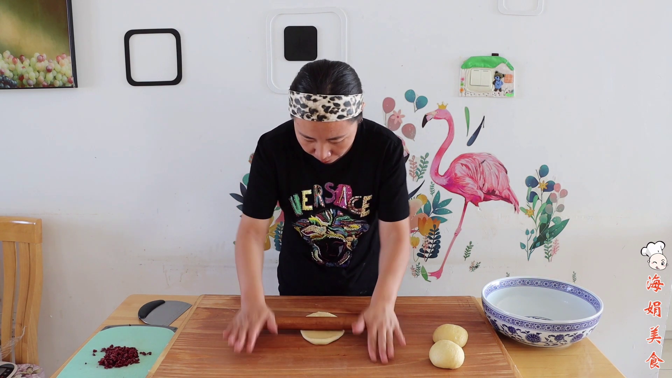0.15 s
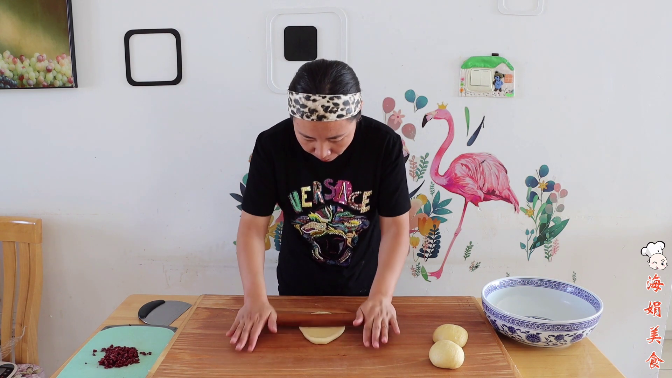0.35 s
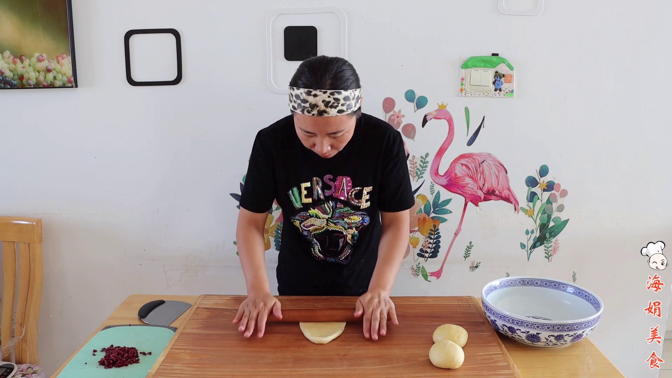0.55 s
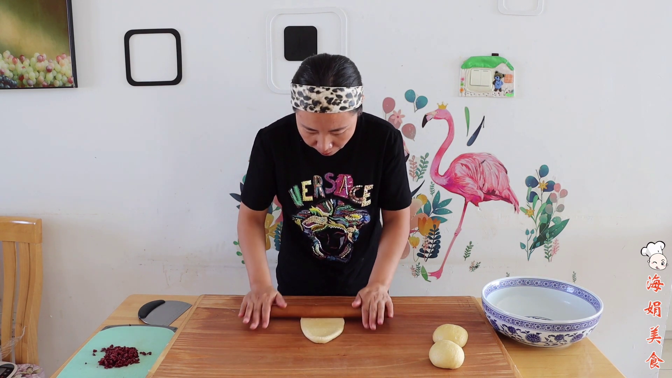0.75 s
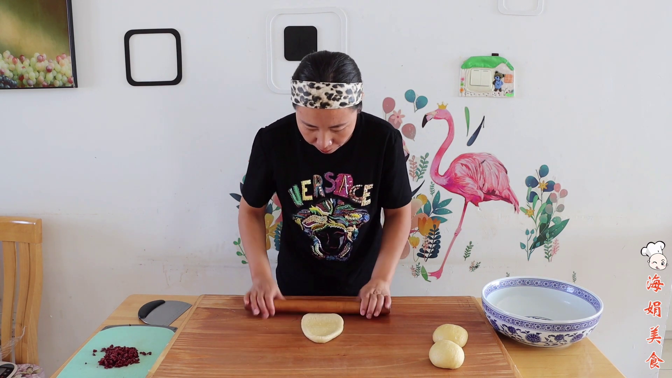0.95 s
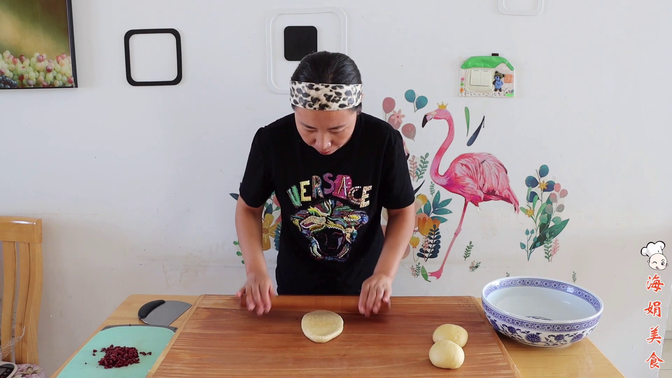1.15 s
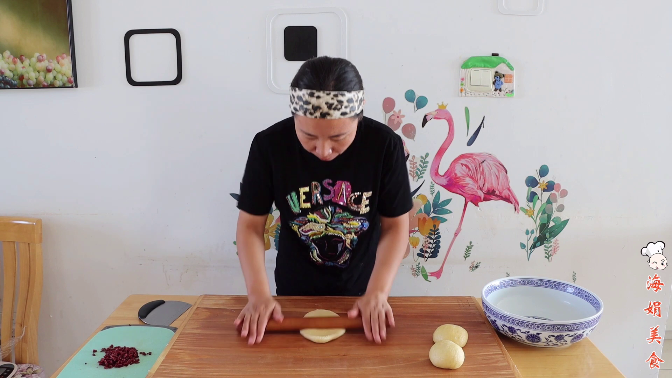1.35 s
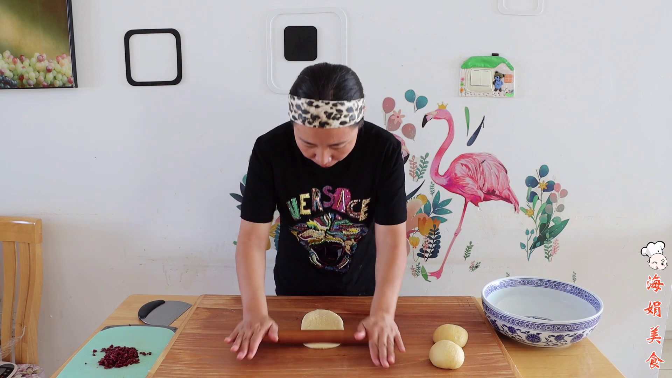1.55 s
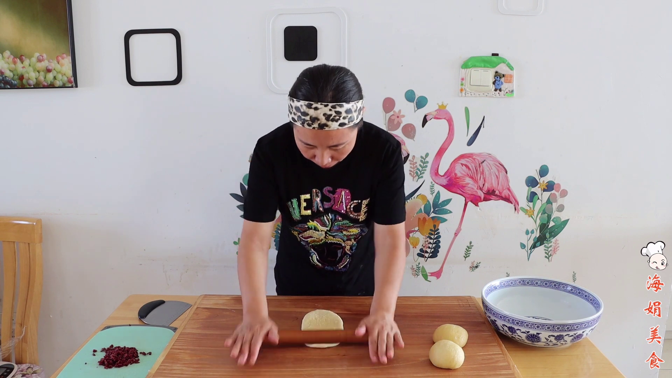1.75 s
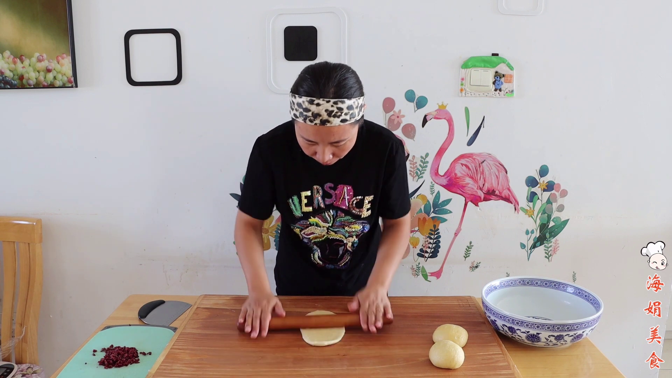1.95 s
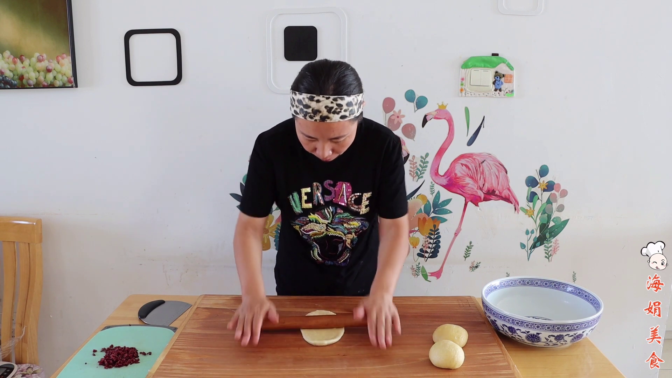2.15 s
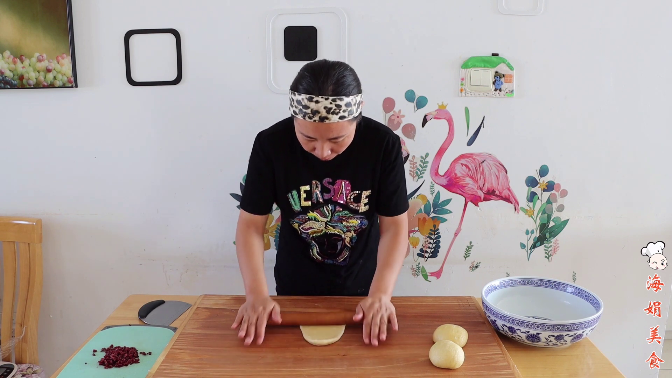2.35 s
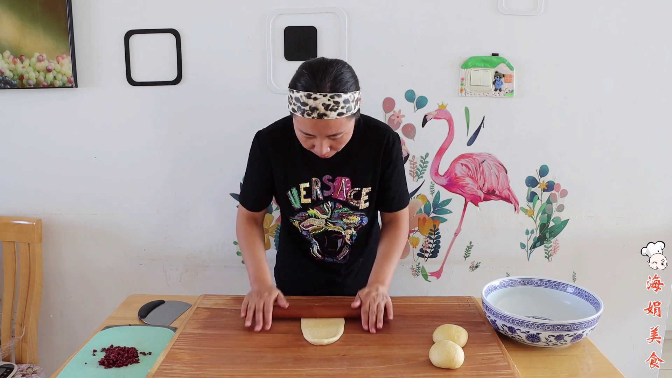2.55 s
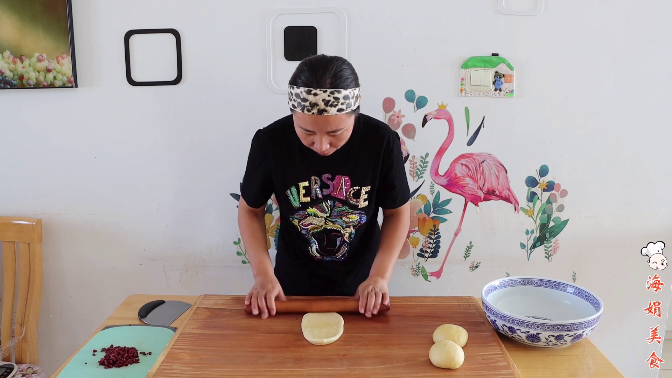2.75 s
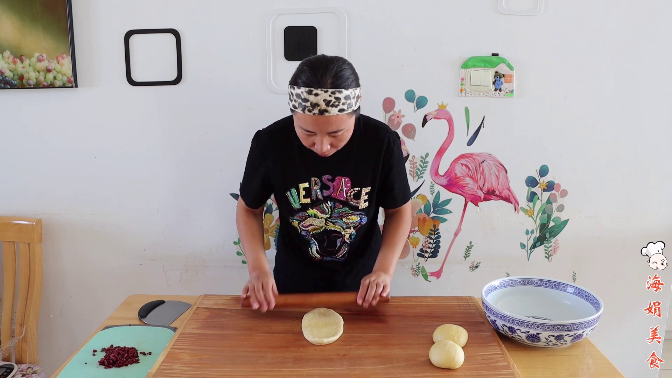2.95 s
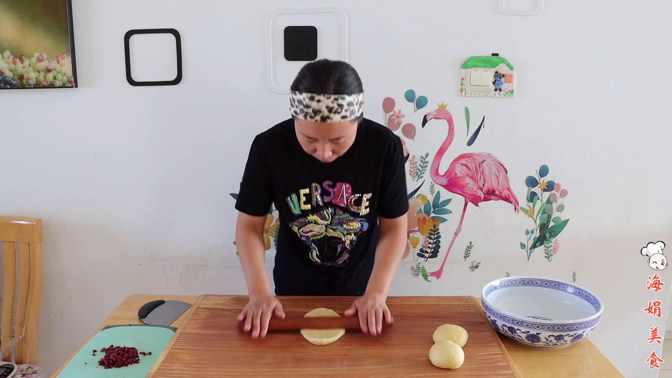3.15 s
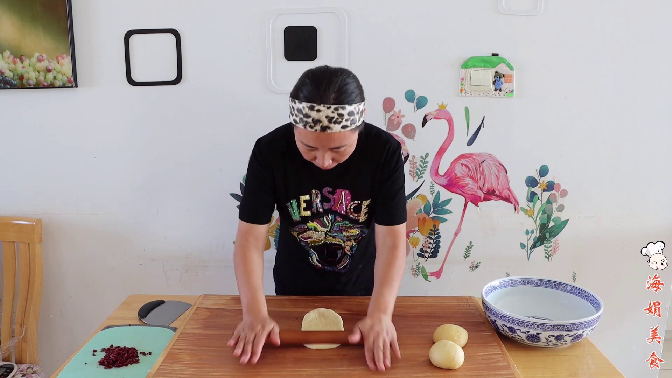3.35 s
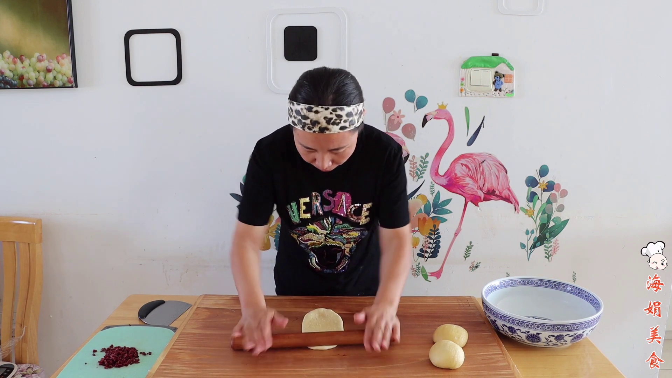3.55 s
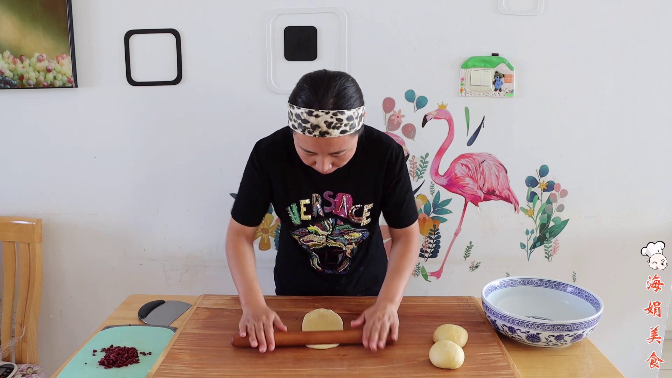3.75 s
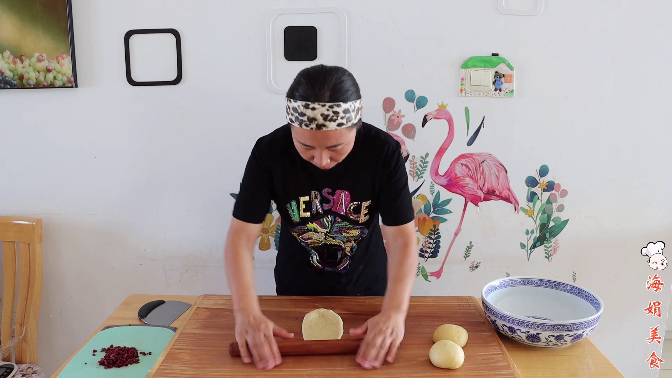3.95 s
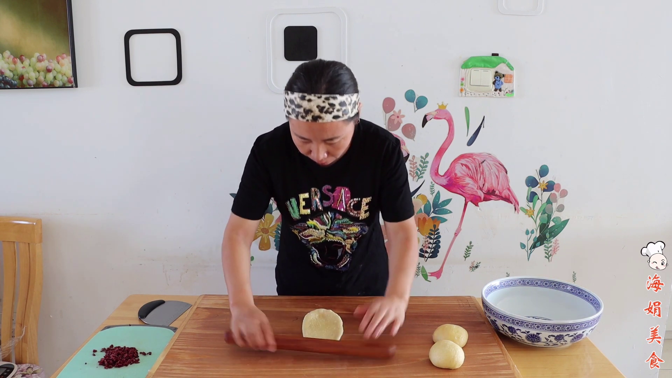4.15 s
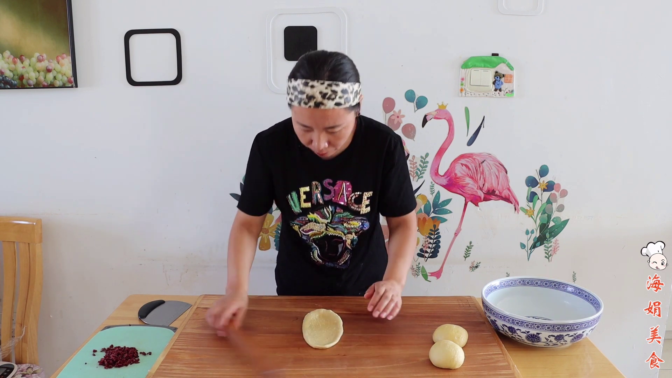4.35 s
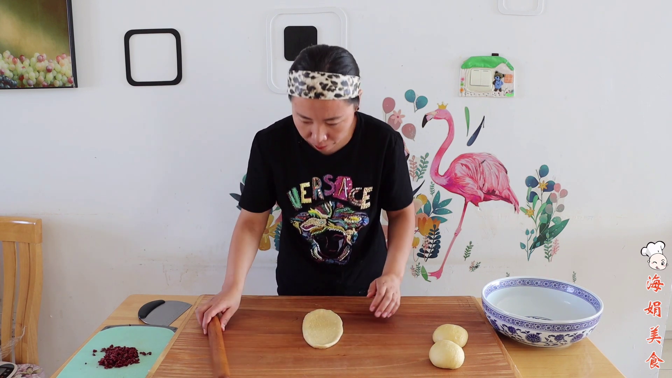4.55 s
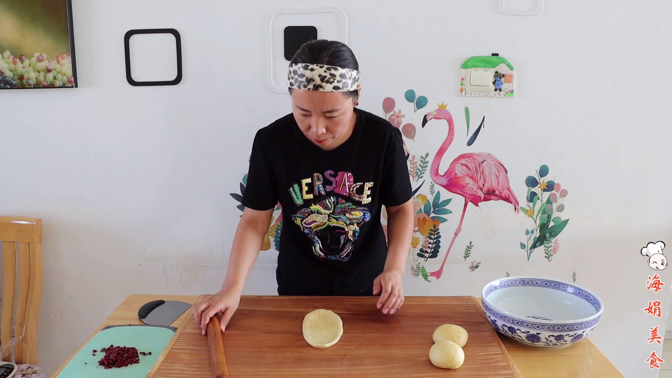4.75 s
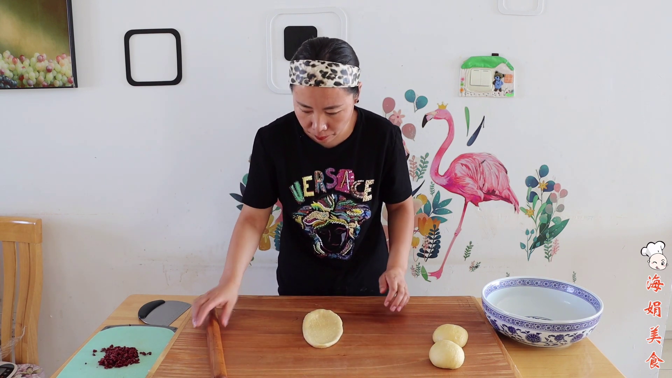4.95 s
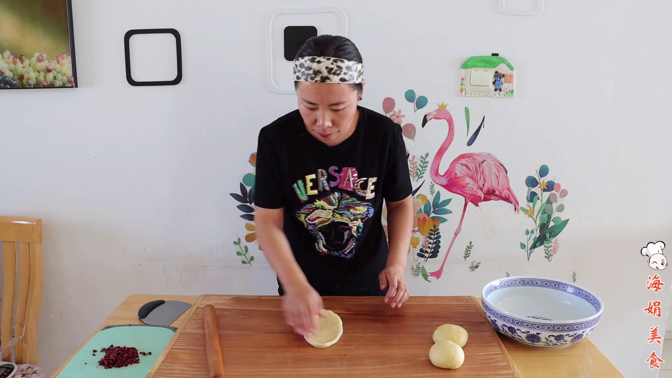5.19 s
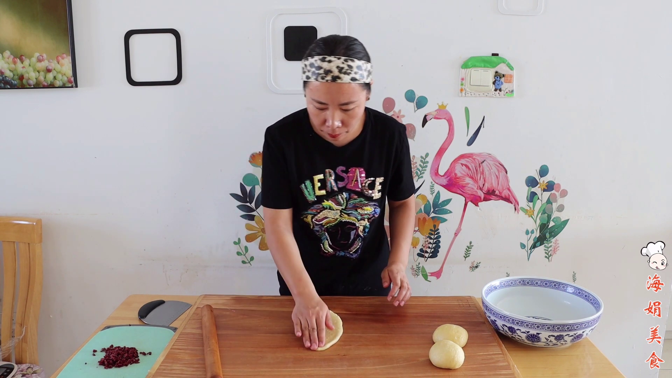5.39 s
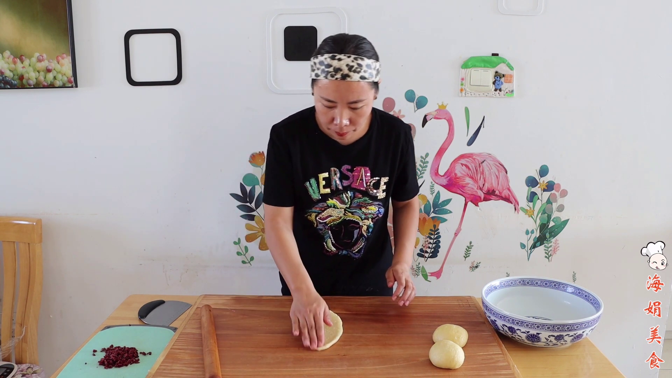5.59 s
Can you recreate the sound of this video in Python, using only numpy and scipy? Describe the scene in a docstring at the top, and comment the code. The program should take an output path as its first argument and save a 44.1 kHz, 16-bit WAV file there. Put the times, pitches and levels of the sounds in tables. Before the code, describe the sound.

A wooden rolling pin works dough on a board in an echoing kitchen, with soft rubs, irregular knocks and one very loud clack.

```python
"""A wooden rolling pin flattens a round of dough on a big board in a bare, echoing kitchen.
Over a faint hiss, pushes make filtered noise rumble and rub, and palms pat the pin in short noise bursts.
Soon small hard clicks ring, sticky dough ticks, and the pin drops off the dough's edge and knocks on the board.
Later the table groans in low swelling tones; near the end the pin is laid aside and a few pushes follow.
Knocks are ringing resonances of wood; the room answers with echoes, standing waves and a fading tail."""
import sys
import numpy as np
from scipy import signal
from scipy.fft import rfft, irfft
from scipy.io import wavfile

SR = 44100
rng = np.random.default_rng(int(sys.argv[2]) if len(sys.argv) > 2 else 0)


def master_out(mix):
    """Clip the mix to full scale and print it as 16-bit PCM to the path in sys.argv[1]."""
    frames = np.transpose(np.atleast_2d(mix))
    ceiling = np.clip(frames, -1, 1)
    pcm = np.round(ceiling * 32767).astype(np.int16)
    wavfile.write(sys.argv[1], SR, pcm)


N = 247842
TIME = np.arange(N) / SR  # seconds
BLOW_TIME = np.arange(SR // 10) / SR  # the tenth of a second in which a blow rings out
BLOW_HZ = np.arange(len(BLOW_TIME) // 2 + 1) * SR / len(BLOW_TIME)

# Colour of the steady background. Each row: frequency in Hz, relative level in dB.
HISS_COLOUR = [(25, -36), (52, -2.5), (95, -19), (150, -5.5), (200, -16), (500, -20.5), (820, -18),
               (1300, -23), (1900, -28), (5000, -33.5), (15500, -37.5)]
# Pushes of the hands on pin, dough and board.
# Each row: start in seconds, end of the hold in seconds after the start, rumble gain in dB, rubbing gain in dB.
HAND_PUSHES = [(0.01, 0.1, -45.5, -49), (0.138, 0.19, -46, -57), (0.285, 0.036, -41.5, -39.5),
               (0.454, 0.13, -57, -37), (0.79, 0.14, -59, -51), (1.136, 0.12, -48.5, -59),
               (1.308, 0.045, -39.5, -40.5), (1.398, 0.047, -58, -52), (1.6, 0.065, -41.5, -38.5),
               (1.78, 0.05, -53, -45), (2.461, 0.17, -59, -53), (2.654, 0.076, -53, -48.5),
               (2.794, 0.036, -56, -49.5), (3.728, 0.067, -47, -53), (4.605, 0.049, -34, -44),
               (4.795, 0.066, -46, -52), (5.15, 0.046, -60, -56), (5.285, 0.052, -49, -38.5),
               (5.45, 0.037, -47, -48)]
# Colour of the table's rumble. Each row: frequency in Hz, relative level in dB.
RUMBLE_COLOUR = [(25, -32), (55, 22.5), (80, 7), (110, 12), (145, -9), (220, -6), (500, -63)]
# Colour of skin and floury dough rubbing. Each row: frequency in Hz, relative level in dB.
RUB_COLOUR = [(80, -13), (160, 7), (300, 5.5), (550, -3.5), (900, -10), (1400, -18), (2500, -22),
              (8000, -49)]
# Palms landing on the pin.
# Each row: start in seconds, level before the mix in dB, treble cut-off in Hz, fading time in seconds.
PALM_PATS = [(0.014, -52, 885, 0.044), (0.474, -45.5, 1230, 0.02), (1.594, -44.5, 2170, 0.027),
             (2.382, -40.5, 2350, 0.03)]
# Colour of a palm on wood. Each row: frequency in Hz, relative level in dB.
PALM_COLOUR = [(60, -27), (230, 7), (450, 3), (1400, 0.5), (2500, -4.5), (5000, -6.5), (15000, -23)]
# Small hard clicks. Each row: start in seconds, level before the mix in dB.
HARD_CLICKS = [(0.7458, -44), (0.917, -52.5), (0.9555, -53)]
# Bright ring of a click. Each row: frequency in Hz, width in Hz, relative level in dB.
CLICK_RESONANCES = [(3300, 210, -7.5), (4450, 430, -3), (4880, 130, 1), (5770, 250, -1), (6700, 270, -0.5),
                    (7500, 430, -5)]
# Ticks of sticky dough and fingertips.
# Each row: start in seconds, level before the mix in dB, treble cut-off in Hz (the bass cut-off is half of it).
DOUGH_TICKS = [(0.9135, -60, 7460), (1.6739, -57, 4900), (2.7113, -66, 8050), (3.521, -59, 6950),
               (3.935, -63, 6000), (3.9716, -50, 1360), (3.9764, -50, 2600), (5.3862, -66, 3200)]
# Pin on board. Each row: start in seconds, level before the mix in dB, contact cut-off in Hz,
# table thump in dB, pin brightness in dB, pitch of the gripped pin in Hz.
PIN_KNOCKS = [(0.974, -26.5, 1540, 8.5, -1.5, 1120), (0.9919, -31, 465, -1, -22, 1130),
              (1.322, -42.5, 328, 16, -6, 1130), (1.411, -35.5, 856, 16, -3, 1170),
              (1.775, -41, 1330, -1.5, -8, 1210), (1.788, -38.5, 480, -2.5, 12, 1210),
              (2.0733, -23.5, 1910, 6, 4.5, 2090), (2.078, -24, 1300, 10, 1, 2120),
              (3.1562, -11.5, 4430, 3.5, 1, 3450), (3.6868, -27.5, 2030, 6, -3, 765),
              (3.697, -38, 1098, 7, 4.5, 770), (4.0482, -32.5, 1820, -1.5, -5, 1540),
              (4.1850, -22.5, 2060, 0.5, 5, 1610), (4.6096, -28.5, 1320, 0, 4.5, 1170),
              (4.6115, -24, 2980, -1, 2, 2934), (4.6159, -21, 1200, 7, 7, 1140),
              (4.626, -35, 3200, 5, -2, 2900), (4.635, -22.5, 795, -12, 10.5, 1180)]
# Table, board and pin ringing together. Each row: frequency in Hz, width in Hz, relative level in dB.
WOOD_RESONANCES = [(83, 4.9, 3), (131.2, 21.7, 3.5), (275, 124, 0.5), (345.5, 31, 1), (399, 17, 1),
                   (510, 97, -1.5), (641, 96, -5), (714, 56, 1.5), (827, 99, -6), (1011, 75, -6),
                   (1207, 153, -2.5), (1448, 91, -6.5), (1555, 93, -6), (2160, 120, -16.5), (2442, 65, -10),
                   (2770, 90, -20), (3445, 450, -17.5), (4880, 360, -17.5)]
# Gaps between the wood's resonances. Each row: frequency in Hz, width in Hz, change in dB.
RESONANCE_GAPS = [(1855, 72, -2), (2980, 75, -9)]
# Groans and booms of the table under the weight.
# Each row: time of the peak in seconds, peak level in dB, pitch in Hz, spread to each side in seconds.
TABLE_GROANS = [(2.695, -40.5, 252, 0.014), (2.868, -48.5, 136, 0.021), (4.669, -33, 79, 0.034)]
# Echoes from table top and near walls. Each row: delay in seconds, gain (before the room's level).
NEAR_ECHOES = [(.0048, 0.12), (0.0097, 0.45), (0.0168, .3)]
# Standing waves of the room. Each row: frequency in Hz, gain in dB (before the room's level).
STANDING_WAVES = [(124, 4.5), (188, 7), (249, 11.5), (312, -12), (381, -9.5), (420, -10), (522, 2),
                  (562, 9.5), (652, 12), (817, 6), (981, 5.5)]
# The kitchen's fading tail.
# Each row: frequency in Hz, time to fall by 60 dB in seconds, strength in dB (before the room's level).
KITCHEN_TAIL = [(70, 0.62, -12.5), (160, 0.63, -4.5), (460, 0.57, 4), (1180, 0.57, 3), (2340, 0.63, 2),
                (5340, 0.58, -6.5), (11700, 0.28, -4.5)]

HISS_DB = -53
# every push swells, holds and dies away
PUSH_ATTACK_S, RUMBLE_RELEASE_S, RUB_RELEASE_S = 0.016, 0.062, 0.055
# a soft, long push bends the board more: its share is 0 dB at this cut-off and grows for each octave below
BOARD_EVEN_HZ, BOARD_DB_PER_OCTAVE = 1840, 5
PIN_NOTE_DB, PIN_NOTE_DB_PER_OCTAVE = 0.5, -4  # the gripped pin's own note at 1 kHz; higher notes are weaker
STANDING_T60_S = 0.77  # time for a standing wave to fall by 60 dB
PLACE_S = 0.7  # in this time the pin reaches a new place on the board
TICK_ROOM_DB = 3  # extra share of the ticks sent into the room
CEILING_DB, RECOVERY_DB_PER_S = -1, 24.5  # the limiter
TOP_HZ = 15800


def amp(db):
    """Turn decibels into a gain."""
    return 10 ** (np.asarray(db) / 20)


def level(x, db):
    """Scale a sound to an average (rms) level."""
    return x * amp(db) / np.sqrt(np.mean(x ** 2))


def add(out, start, x):
    """Mix a sound in from a start time in seconds."""
    i = max(int(start * SR), 0)
    out[i:i + len(x)] += x[:N - i]


def along(hz, points_hz, values):
    """Join points by straight lines, with every octave equally wide."""
    return np.interp(np.log(np.maximum(hz, 1)), np.log(points_hz), values)


def colour(x, points):
    """Shape a sound's spectrum by (Hz, dB) points."""
    hz = np.arange(len(x) // 2 + 1) * SR / len(x)
    gain = amp(along(hz, *np.transpose(points)))
    return irfft(rfft(x) * gain, len(x))


def cut(x, hz, kind="low", order=2):
    """Remove what lies above ("low") or below ("high") a frequency."""
    sections = signal.butter(order, min(hz, SR / 2 - 1000), kind, fs=SR, output="sos")
    return signal.sosfilt(sections, x)


def resonances(modes):
    """Power response of a body that rings at a few (Hz, width Hz, dB) modes."""
    f = np.maximum(BLOW_HZ, 1)
    return sum(amp(db) ** 2 / (1 + ((f * f - hz * hz) / (f * width)) ** 2) for hz, width, db in modes)


def ring(power):
    """Ring of a struck body with this power response: all of it starts at the blow (minimum phase)."""
    half = len(BLOW_TIME) // 2
    cepstrum = irfft(np.log(power + power.max() * 1e-10) / 2)
    # fold the second half onto the first, so that nothing sounds before the blow
    cepstrum[1:half] *= 2
    cepstrum[half + 1:] = 0
    return irfft(np.exp(rfft(cepstrum)))


def hiss():
    """A faint steady background: random noise with a fixed colour, strongest in the bass."""
    return level(colour(rng.standard_normal(N), HISS_COLOUR), HISS_DB)


def push(start, hold, release_s):
    """Pressure of one push: it rises, holds and dies away."""
    age = TIME - start
    attack = np.clip(age / PUSH_ATTACK_S, 0, 1)
    release = np.exp(-np.maximum(age - hold, 0) / release_s)
    return attack * release


def rumble(rumble_db=-4):
    """The table rumbles with each push: low noise follows the pressure."""
    pressure = sum(amp(db) * push(start, hold, RUMBLE_RELEASE_S) for start, hold, db, _ in HAND_PUSHES)
    return level(colour(rng.standard_normal(N), RUMBLE_COLOUR), rumble_db) * pressure


def rubbing(rub_db=-7, grain_db=3):
    """Skin and floury dough rub in small slips: noise whose strength jumps every 200 samples."""
    pressure = sum(amp(db) * push(start, hold, RUB_RELEASE_S) for start, hold, _, db in HAND_PUSHES)
    grain = np.repeat(rng.standard_normal(N // 200 + 1), 200)[:N]
    slips = rng.standard_normal(N) * amp(grain_db * grain)
    return level(colour(slips, RUB_COLOUR), rub_db) * pressure


def pats():
    """Skin meets wood in a short spray of tiny contacts: a burst of noise that fades."""
    out = np.zeros(N)
    for start, db, bright_hz, fade_s in PALM_PATS:
        contacts = colour(rng.standard_normal(len(BLOW_TIME)), PALM_COLOUR)
        contacts *= np.exp(-BLOW_TIME / fade_s)
        add(out, start, level(cut(contacts, bright_hz, order=1), db))
    return out


def clicks():
    """Something small and hard clicks and rings for a moment at its own resonances."""
    out = np.zeros(N)
    for start, db in HARD_CLICKS:
        add(out, start, level(ring(resonances(CLICK_RESONANCES)), db))
    return out


def ticks(snap_s=0.0016):
    """Tacky dough lets go in tiny snaps: very short bursts of noise."""
    out = np.zeros(N)
    for start, db, hz in DOUGH_TICKS:
        snap = rng.standard_normal(len(BLOW_TIME)) * np.exp(-BLOW_TIME / snap_s)
        snap = cut(cut(snap, hz, order=1), hz / 2, "high", order=1)
        add(out, start, level(snap, db))
    return out


def knocks(pin_width_hz=60, steepness=5.04, flex_ratio=2.4):
    """Wood on wood: dough softens the contact, a heavy drop shakes the table, the grip sets the pin's own note."""
    out = np.zeros(N)
    wood = resonances(WOOD_RESONANCES)
    gaps_db = sum(db * np.exp(-((BLOW_HZ - hz) / width) ** 2) for hz, width, db in RESONANCE_GAPS)
    gaps = amp(gaps_db) ** 2
    for start, db, contact_hz, thump_db, pin_db, note_hz in PIN_KNOCKS:
        board_db = BOARD_DB_PER_OCTAVE * np.log2(BOARD_EVEN_HZ / contact_hz)
        # table, board, an even middle and pin each weight their own part of the spectrum
        share = amp(along(BLOW_HZ, [140, 370, 750, 1250], [thump_db, board_db, 0, pin_db])) ** 2
        note_db = PIN_NOTE_DB + PIN_NOTE_DB_PER_OCTAVE * np.log2(note_hz / 1000)
        note = resonances([(note_hz, pin_width_hz, note_db)])
        body = gaps * (wood * share + note)
        contact = 1 / (1 + (BLOW_HZ / contact_hz) ** steepness)  # a longer push leaves out the treble
        contact /= 1 + (BLOW_HZ / (flex_ratio * contact_hz)) ** 8  # and its smooth start removes the very top
        add(out, start, level(ring(body * contact), db))
    return out


def bend(x, hz, width_hz):
    """Bending waves run slower the lower they are: an all-pass holds back the body of a knock."""
    radius = np.exp(-np.pi * width_hz / SR)
    poles = [1, -2 * radius * np.cos(2 * np.pi * hz / SR), radius ** 2]
    return signal.lfilter(poles[::-1], poles, x)


def groans():
    """The wood takes the load: short low tones swell and fade."""
    out = np.zeros(N)
    for peak_s, db, hz, spread_s in TABLE_GROANS:
        age = TIME - peak_s
        swell = np.exp(-(age / spread_s) ** 2 / 2)
        out += amp(db) * swell * np.sin(2 * np.pi * hz * age)
    return out


def walls():
    """Near echoes and standing waves, the same all over the board."""
    t = np.arange(SR) / SR
    # each echo is a pulse, delayed and dulled
    response = sum(gain * cut(np.sinc((t - delay) * SR), 4100, order=1) for delay, gain in NEAR_ECHOES)
    decay = np.log(1000) / STANDING_T60_S
    for hz, db in STANDING_WAVES:
        wave = np.exp(-decay * t) * np.cos(2 * np.pi * hz * t)
        response += 2 * decay / SR * amp(db) * wave
    return response


def diffuse(build_s=0.00033):
    """Countless mixed reflections from one place on the board: noise bands that die at their own rates."""
    t = np.arange(SR) / SR
    points_hz, t60s, dbs = np.transpose(KITCHEN_TAIL)
    noise = rfft(rng.standard_normal(SR))
    bins = np.arange(SR // 2 + 1)  # one bin per Hz
    edges = 40 * 2 ** np.arange(0, 9, 1 / 3)  # third-octave bands
    response = np.zeros(SR)
    build = 1 - np.exp(-t / build_s)
    for lo, hi in zip(edges, edges[1:]):
        hz = np.sqrt(lo * hi)
        band = irfft(noise * ((bins >= lo) & (bins < hi)), SR)
        band *= build * np.exp(-np.log(1000) * t / along(hz, points_hz, t60s))
        # a wider band holds more energy
        response += level(band, along(hz, points_hz, dbs)) * np.sqrt(2 * (hi - lo)) / SR
    return response


def kitchen(x):
    """The room's answer: steady walls, and a diffuse tail that changes as the pin moves."""
    out = signal.fftconvolve(x, walls())[:N]
    for s in np.arange(0, TIME[-1] + PLACE_S / 2, PLACE_S):
        here = np.abs(TIME - s) < PLACE_S
        fade = np.cos(np.pi / 2 * (TIME[here] - s) / PLACE_S)  # blend from place to place
        add(out, TIME[here][0], signal.fftconvolve(x[here] * fade, diffuse()))
    return out


def scene(direct_db=-2, room_db=-5.0, click_direct_db=-13, beam_hz=750):
    """Mix direct sound and room sound; rumble, groans and hiss join without the room."""
    background = hiss()
    table_rumble = rumble()
    rub = rubbing()
    pat = pats()
    click = clicks()
    tick = ticks()
    knock = bend(bend(knocks(), hz=462, width_hz=630), hz=1070, width_hz=304)
    board = knock + pat + rub
    # the board sends little bass straight ahead: the lows come by way of the room
    direct = amp(direct_db) * (cut(board, beam_hz, "high", order=1) + tick)
    direct += amp(click_direct_db) * click
    room = amp(room_db) * kitchen(board + click + amp(TICK_ROOM_DB) * tick)
    return (direct + room + table_rumble + groans() + background)[None]


def record(dry):
    """A limiter ducks at once under the loudest peak and recovers steadily; the top is cut."""
    over_db = 20 * np.log10(np.maximum(np.abs(dry) / amp(CEILING_DB), 1))
    recovered_db = RECOVERY_DB_PER_S * TIME
    duck_db = np.maximum.accumulate(over_db + recovered_db, axis=-1) - recovered_db
    top_cut = signal.ellip(10, .2, 70, TOP_HZ, fs=SR, output="sos")
    return signal.sosfilt(top_cut, dry * amp(-duck_db))


dry = scene()
out = record(dry)
master_out(out)
```